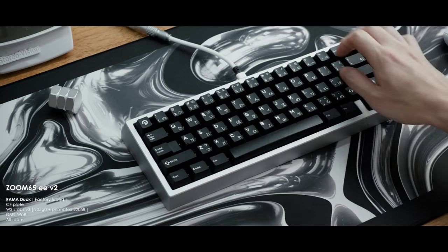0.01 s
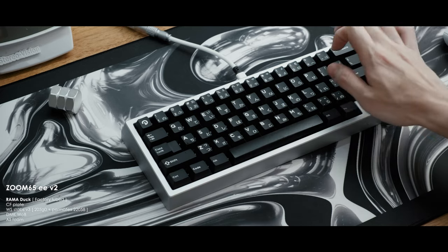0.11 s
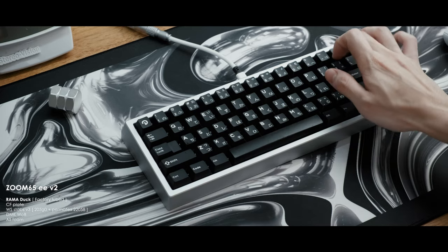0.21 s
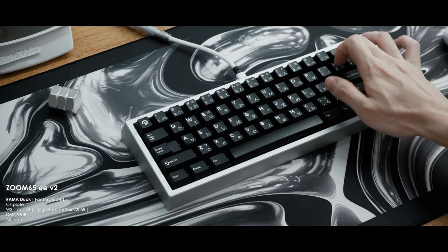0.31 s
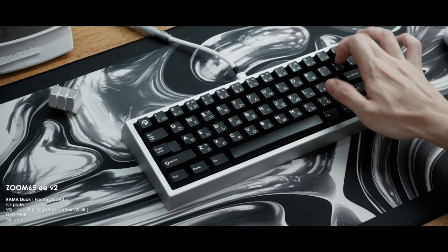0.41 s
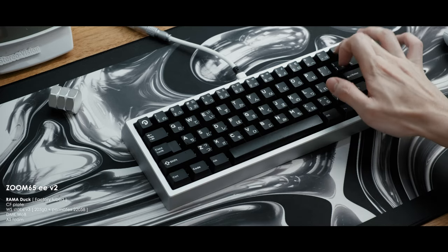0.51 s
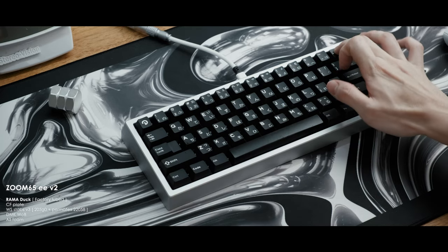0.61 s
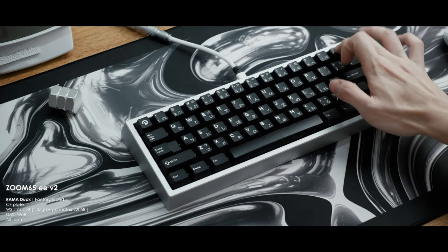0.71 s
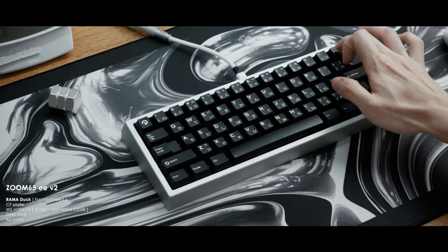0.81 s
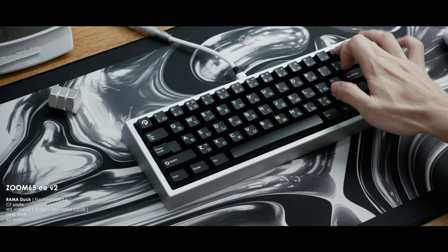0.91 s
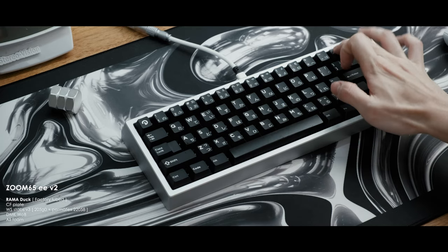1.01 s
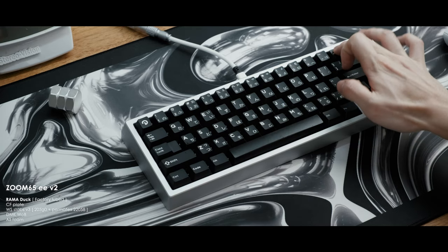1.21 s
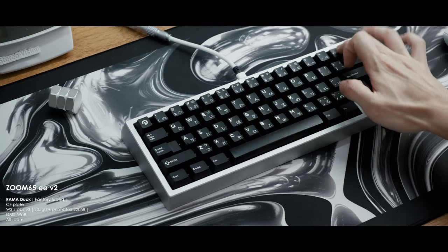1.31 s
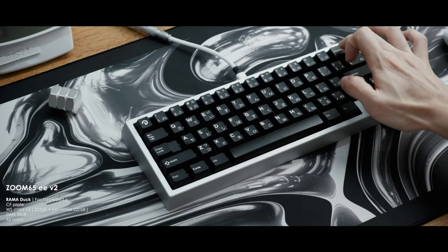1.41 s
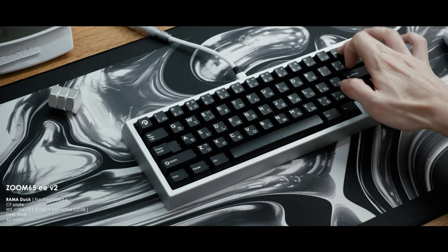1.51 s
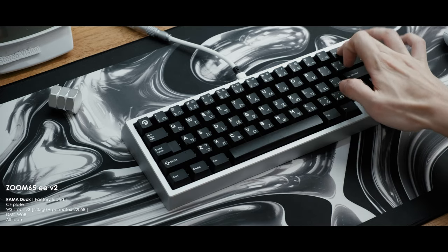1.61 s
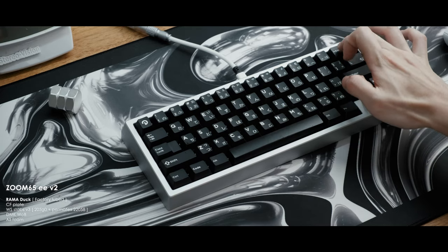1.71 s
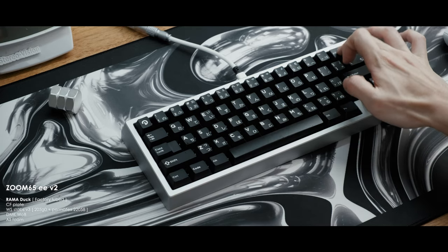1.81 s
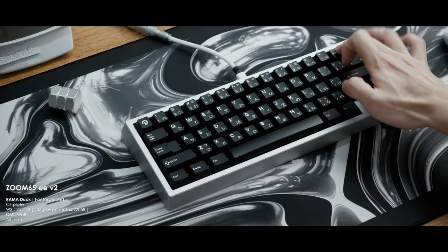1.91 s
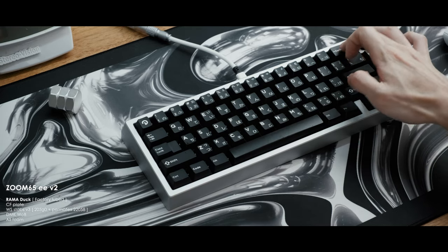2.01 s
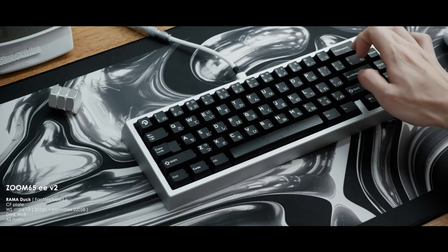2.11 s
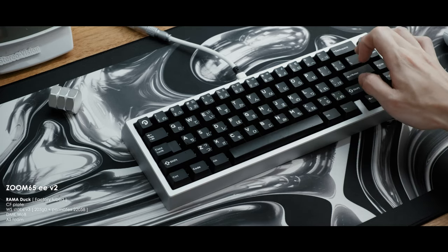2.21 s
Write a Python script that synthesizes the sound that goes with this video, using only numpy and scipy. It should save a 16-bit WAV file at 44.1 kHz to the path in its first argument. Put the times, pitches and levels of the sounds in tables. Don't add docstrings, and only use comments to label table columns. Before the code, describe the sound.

Keyboard clacks, close and dry: after a brief quiet start with a tiny tick, steady rapid taps grow slightly louder, dip near the end, then finish on a strong one; soft key releases, low desk thump, faint hum.

```python
import sys
import numpy as np
from scipy import signal
from scipy.fft import rfft, irfft
from scipy.io import wavfile
from scipy.ndimage import uniform_filter1d, map_coordinates

SR = 44100
rng = np.random.default_rng(int(sys.argv[2]) if len(sys.argv) > 2 else 0)


def digitize_waveform(pressure):
    field = np.atleast_2d(pressure).T
    bounded = np.clip(field, -1, 1)
    quanta = np.round(bounded * 32767).astype(np.int16)
    wavfile.write(sys.argv[1], SR, quanta)


def amplitude_ratio(level_db):
    exponent = np.asarray(level_db, float) / 20
    return 10 ** exponent


N = 99225
t = np.arange(N) / SR

# start_s, peak_db, treble_db, thump_db, bite_db
PRESSES = [(0.205, -23.5, 0, 2.3, -2.2), (0.337, -25, -0.2, 1.5, -2.3), (0.475, -19, -1.2, 0.3, -3.3),
           (0.617, -18.5, -2.1, 1.3, -6.3), (0.763, -18, -2.4, 0.5, -4), (0.912, -17.5, 0, 0, -3.5),
           (1.057, -17, -1.8, -0.1, -1.5), (1.204, -17.5, 0.1, -1.6, -0.5),
           (1.355, -16.5, -1.5, -0.4, -1.2), (1.501, -17.5, -1.5, -0.6, -2.5),
           (1.649, -21.5, -1.3, 1.5, -5.3), (1.793, -20, -3.5, -0.2, -4.5), (1.948, -16, -0.4, 0.1, -2)]
# start_s, peak_db, treble_db, bite_db
RELEASES = [(0.258, -39.5, -4, -0.3), (0.4, -32.5, -1.5, 5.2), (0.548, -36.5, -2.5, 1.8),
            (0.695, -39.5, 2.5, 3), (0.836, -35, 0.5, 3.6), (0.982, -34.5, 3, 4.3), (1.129, -35, 0.5, 4),
            (1.274, -32.5, 5, 4.8), (1.425, -33, 5, 3.8), (1.571, -36.5, 1.5, 4), (1.721, -38, 0.5, 2.5),
            (1.865, -34, 2, 3.5), (2.032, -38.5, 0, 3.3)]
# start_s, peak_db, treble_db
WIRE_TICKS = [
    (0.197, -37.5, -3.5),
    (0.3223, -51, -7),
]

# pitch_hz, width_hz, level_db, side (sign of the mode shape)
PRESS_MODES = [(917, 136, -13.5, 1), (1046, 121, -15, 1), (1359, 151, -10.5, 1), (1509, 222, -7, 1),
               (1692, 133.4, -2, 1), (2080, 137, -5.5, 1), (2404, 190, -7, -1), (2777, 68, -21.5, -1),
               (3138, 202, -6.5, 1), (3430, 254, -18.5, -1), (3936, 74, -27, -1)]
RELEASE_MODES = [(920, 169, -8.5, 1), (1083, 90, -13.5, 1), (1283, 120, -14.5, 1), (1545, 140, -15, 1),
                 (1932, 185, -17.5, -1), (2315, 115, -17, 1), (2796, 110, -26.5, -1), (3010, 165, -28, 1),
                 (3626, 520, -15.5, -1)]
# pitch_hz, width_hz, level_db, side
WIRE_MODES = [(5300, 170, -1, 1), (1100, 200, -9, 1), (3500, 900, -9, 1)]
# pitch_hz, width_hz, level_db, side
SHELL_MODES = [(4500, 300, -4.5, 1), (5215, 550, 1.04, -1), (7180, 340, -15, 1), (7760, 276, -16.5, -1),
               (10450, 760, -5, 1), (11300, 500, -8.5, -1), (14500, 1000, -8, 1)]
# pitch_hz, t60_s, level_db
DESK_MODES = [(424.9, 0.1, -25), (481.3, 0.033, -18), (579, 0.062, -28.5), (313, 0.033, -21.5),
              (238.5, 0.14, -36)]

# delay_s, level_db
ECHOES = [(.0103, -30), (.0212, -33)]
# centre_hz, t60_s, level_db
ROOM_BANDS = [(286, 0.4, -17), (700, 0.73, -23), (1500, 0.36, -26.5), (3240, 0.4, -31.5),
              (6000, 0.28, -35.5), (12000, 0.23, -30)]
# pitch_hz, density_db (per Hz)
AIR_SPECTRUM = [(24, -41.5), (40, -32), (70, -11), (103, -31.5), (163, 11.5), (587, -5.5), (1130, -9),
                (4480, -29.5), (13000, -55.5)]
# pitch_hz, rms_db
MOTOR_LINES = [(128, -69), (193, -66), (257, -76), (385, -76), (78, -86)]

PRESS_DB, RELEASE_DB, TICK_DB = 4.8, 6.6, 4.8
SHELL_DB, WIRE_SHELL_DB = -29, -14.5
SCATTER_DB, DETUNE = 1.4, .005
RISE_S, BITE_HZ, RADIATES_HZ = .00025, 2050, 674.7
CHATTER_S, CHATTER_SHARE = .0015, .4
HABIT = rng.standard_normal(4096)
SLIDE_DB, SLIDE_S, SLIDE_HZ = -54, .011, 5200
BUZZ_DB, BUZZ_HZ, BUZZ_OCT = -76, 5300, .2
SIDEWAYS_DB, SIDEWAYS_S, SIDEWAYS_HZ = -10.5, .00095, 2315
DESK_RISE_S, DESK_RELEASE_DB = .0019, 9
ROOM_START_S = .006
AIR_DB = -66
HUM_DB, HUM_WANDER_DB, HUM_RATE_HZ = -.1, -3, 7.3
HISS_DB, HISS_HZ = -93.5, 10400
FADE_S = .11
LOW_CUT_HZ, TOP_HZ = 98, 14400


def band(x, hz, octaves):
    edges = np.clip([hz * 2 ** (-octaves / 2), hz * 2 ** (octaves / 2)], 10, SR / 2.2)
    return signal.sosfilt(signal.butter(2, edges, "band", fs=SR, output="sos"), x)


def unit(x):
    return x / np.sqrt(np.mean(x ** 2))


def band_noise(hz, octaves):
    return unit(band(rng.standard_normal(N), hz, octaves))


def bursts(events, shape):
    return sum(amplitude_ratio(event[1]) * shape(t - event[0]) for event in events)


def microphone_hiss():
    return amplitude_ratio(HISS_DB) * band_noise(HISS_HZ, .51)


def fan():
    f = np.maximum(np.arange(N // 2 + 1) * SR / N, 1)
    hz, db = np.array(AIR_SPECTRUM).T
    gain = amplitude_ratio(np.interp(np.log(f), np.log(hz), db))
    out = unit(irfft(rfft(rng.standard_normal(N)) * gain, N)) * amplitude_ratio(AIR_DB)
    for hz, db in MOTOR_LINES:
        steps = rng.standard_normal((2, 64))
        level, phase = [map_coordinates(s, [t * HUM_RATE_HZ], mode="mirror") for s in steps]
        line = np.sin(2 * np.pi * hz * t + 1.8 * phase)
        out = out + np.sqrt(2) * amplitude_ratio(db + HUM_DB + HUM_WANDER_DB * level) * line
    return out


def sideways_puffs():
    puffs = bursts(list(PRESSES) + list(RELEASES), lambda u: (u > 0) * np.exp(-np.abs(u) / SIDEWAYS_S))
    return amplitude_ratio(SIDEWAYS_DB) * puffs * band_noise(SIDEWAYS_HZ, 2.38)


def room(x, puffs):
    u = t[:SR]
    build = 1 - np.exp(-(u / ROOM_START_S) ** 2)
    tail = 0
    for hz, t60, db in ROOM_BANDS:
        part = band(rng.standard_normal(SR), hz, .93) * np.exp(-np.log(1000) * u / t60) * build
        part = part / np.sqrt(np.sum(part ** 2))
        tail = tail + 3 * amplitude_ratio(db) * part * np.sqrt(hz / SR * 2)
    echoes = sum(amplitude_ratio(db) * np.sinc((u - lag) * SR) for lag, db in ECHOES)
    return (signal.fftconvolve(x + puffs, tail) + signal.fftconvolve(x, echoes))[:N]


def desk():
    blows = [(start, db + thump) for start, db, treble, thump, bite in PRESSES]
    blows += [(start, db + DESK_RELEASE_DB) for start, db, treble, bite in RELEASES]

    def rock(u):
        u = np.maximum(u, 0)
        rings = sum(amplitude_ratio(db) * np.exp(-np.log(1000) * u / t60) * np.sin(2 * np.pi * hz * u)
                    for hz, t60, db in DESK_MODES)
        return (1 - np.exp(-(u / DESK_RISE_S) ** 2)) * rings

    return bursts(blows, rock)


def stem_scrape():
    slide = bursts(PRESSES, lambda u: (u < 0) * np.exp(-(u / SLIDE_S) ** 4))
    return amplitude_ratio(SLIDE_DB) * slide * band_noise(SLIDE_HZ, .58)


def decay(modes, u, bite_db=0.):
    hz, width, db, side = np.array(modes, float).T[:, :, None]
    pitch_luck, level_luck = rng.standard_normal((2, len(modes), 1))
    db = db + SCATTER_DB * level_luck + bite_db * (hz > BITE_HZ)
    tones = np.sin(2 * np.pi * hz * (1 + DETUNE * pitch_luck) * u)
    return (side * amplitude_ratio(db) * np.exp(-np.pi * width * u) * tones).sum(axis=0)


def blow(start, modes, peak_db, shell_db, bite_db=0.):
    u = np.arange(len(HABIT)) / SR
    body = decay(modes, u, bite_db) * (1 - np.exp(-u / RISE_S))
    body = signal.sosfilt(signal.cheby2(6, 30, RADIATES_HZ, "high", fs=SR, output="sos"), body)
    chatter = (HABIT + CHATTER_SHARE * rng.standard_normal(len(u))) * np.exp(-u / CHATTER_S)
    shell = signal.fftconvolve(decay(SHELL_MODES, u), chatter)[:len(u)]
    shell = shell / np.sqrt(np.mean(shell[:128] ** 2))
    x = body / np.abs(body).max() + amplitude_ratio(shell_db) * shell
    out = np.zeros(N + len(u))
    out[int(start * SR):][:len(u)] = x * amplitude_ratio(peak_db)
    return out[:N]


def stabiliser_wire():
    ticks = sum(blow(start, WIRE_MODES, db + TICK_DB, WIRE_SHELL_DB + treble)
                for start, db, treble in WIRE_TICKS)
    loose = 1. * (t > WIRE_TICKS[0][0]) * (t < WIRE_TICKS[1][0])
    loose = uniform_filter1d(loose, size=400)
    return ticks + amplitude_ratio(BUZZ_DB) * loose * band_noise(BUZZ_HZ, BUZZ_OCT)


def clacks():
    presses = sum(blow(start, PRESS_MODES, db + PRESS_DB, SHELL_DB + treble, bite)
                  for start, db, treble, thump, bite in PRESSES)
    releases = sum(blow(start, RELEASE_MODES, db + RELEASE_DB, SHELL_DB + treble, bite)
                   for start, db, treble, bite in RELEASES)
    return releases - presses


def scene():
    keys = microphone_hiss() + stem_scrape() + stabiliser_wire() + clacks()
    fade = np.clip(np.minimum(t, t[-1] - t) / FADE_S + .66, 0, 1)
    return ((fan() + room(keys, sideways_puffs()) + desk() + keys) * fade)[None]


def low_pass(x):
    return signal.sosfilt(signal.butter(12, 16470, fs=SR, output="sos"), x)


def record(dry):
    x = signal.sosfilt(signal.butter(2, LOW_CUT_HZ, "high", fs=SR, output="sos"), dry)
    x = signal.sosfilt(signal.butter(8, TOP_HZ, fs=SR, output="sos"), x)
    return low_pass(x)


dry = scene()
out = record(dry)
digitize_waveform(out)
```